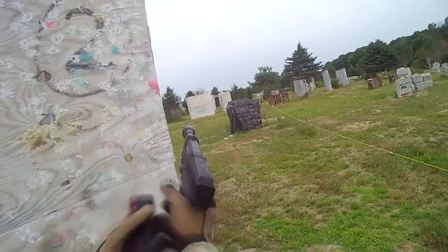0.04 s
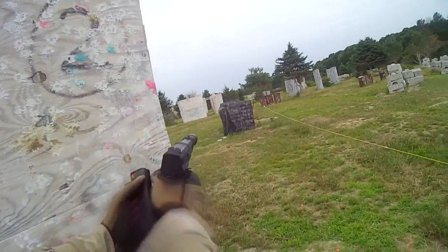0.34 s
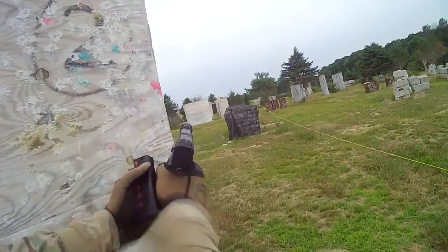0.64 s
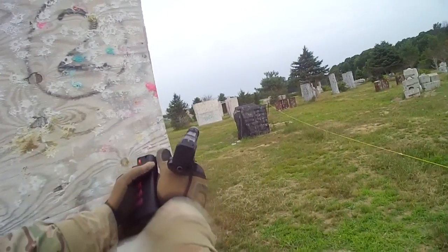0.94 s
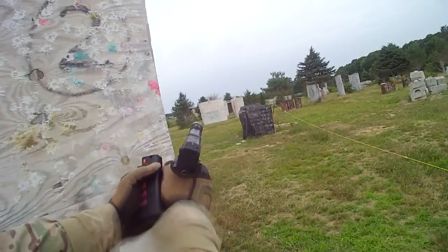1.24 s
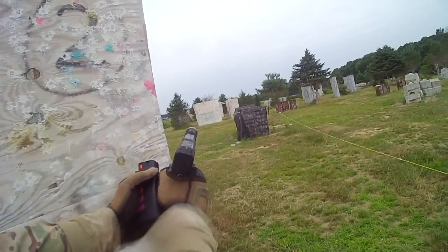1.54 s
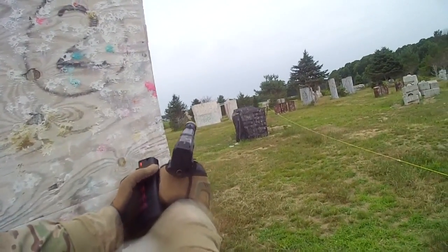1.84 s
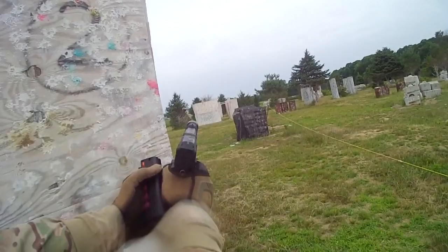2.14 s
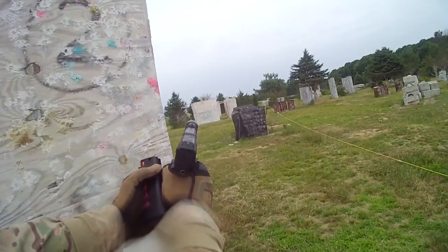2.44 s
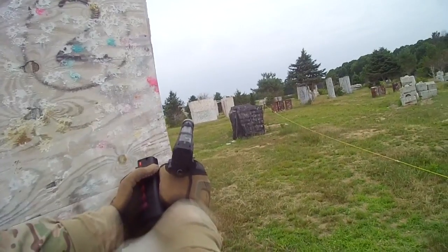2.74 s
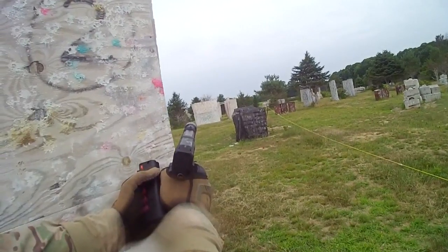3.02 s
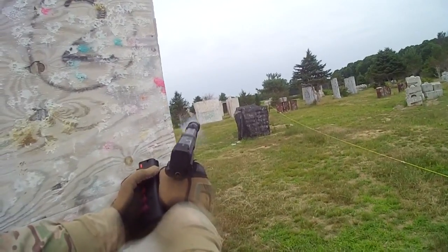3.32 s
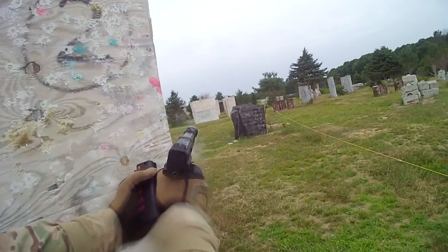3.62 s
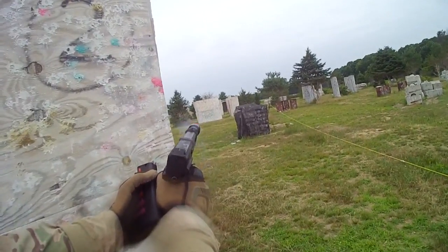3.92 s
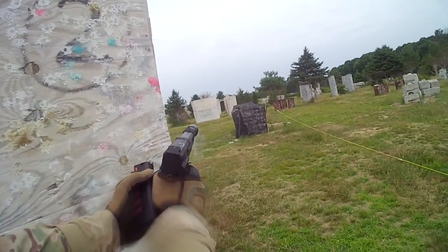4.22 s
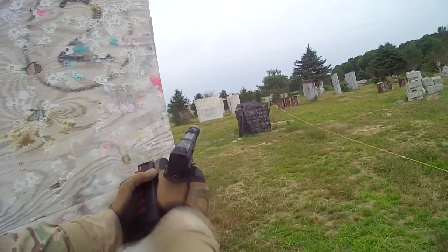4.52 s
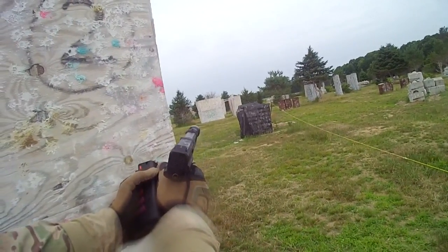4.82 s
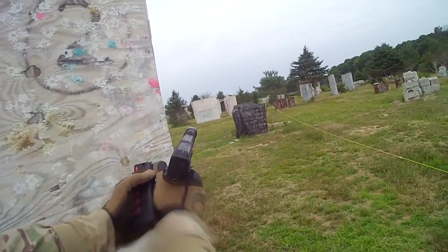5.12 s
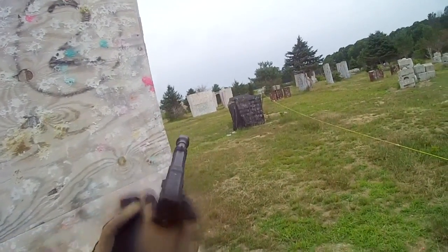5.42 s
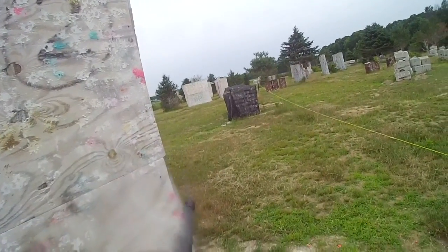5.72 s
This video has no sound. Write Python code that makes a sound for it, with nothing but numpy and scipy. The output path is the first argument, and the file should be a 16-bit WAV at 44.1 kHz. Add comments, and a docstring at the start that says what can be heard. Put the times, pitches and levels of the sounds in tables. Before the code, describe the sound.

Light wind, gear clacks and faraway paintball pops, then two loud cracks from a nearby marker echo briefly outdoors.

```python
"""An open paintball field, behind a plywood bunker: a marker fires twice, close to a body-worn microphone.
Each shot is a puff of pilot gas, the knock of the bolt and a blast that overloads the microphone;
grass, bunkers and trees throw it back. Sleeves rustle and gear clacks as the player aims.
Other markers pop far away, balls smack into cover, and a light wind buffets the microphone."""
import sys
import numpy as np
from scipy import signal
from scipy.fft import rfft, irfft
from scipy.io import wavfile

SR = 44100
rng = np.random.default_rng(int(sys.argv[2]) if len(sys.argv) > 2 else 0)


def put_to_file(sound):
    """Save the sound as 16-bit audio at rate SR, in the file named by the first command-line argument."""
    columns = np.atleast_2d(sound).T  # one column per channel
    safe = np.clip(columns, -1, 1)
    whole_steps = np.round(safe * 32767)
    wavfile.write(sys.argv[1], SR, whole_steps.astype(np.int16))


N = 254016
TIME = np.arange(N) / SR


def from_db(db):
    """Decibels to gain."""
    return 10 ** (np.asarray(db) / 20)


def colour(x, spectrum, size=4096):
    """Causal EQ through (Hz, relative dB) points; white noise keeps its power."""
    hz, db = np.transpose(spectrum)
    grid = np.maximum(np.fft.rfftfreq(size, 1 / SR), 1)
    gain = from_db(np.interp(np.log(grid), np.log(hz), db))
    cepstrum = irfft(np.log(gain))
    cepstrum[1:size // 2] *= 2   # fold for minimum phase
    cepstrum[size // 2 + 1:] = 0
    response = irfft(np.exp(rfft(cepstrum)))
    return signal.fftconvolve(x, response / np.linalg.norm(response))[:N]


def noise():
    """White noise of unit power."""
    return rng.standard_normal(N)


def drift(rate_hz):
    """A random wobble gliding between values with a spread of one."""
    knots = rng.standard_normal(N)
    return np.interp(TIME * rate_hz, np.arange(N), knots)


def clicks(rows):
    """One click for each (seconds, dB)."""
    out = np.zeros(N)
    for s, db in rows:
        out[round(s * SR)] += from_db(db)
    return out


def burst(s, level_db, fall_s, hold_s=0):
    """An envelope that jumps up, holds and dies away."""
    age = TIME - s
    return from_db(level_db) * (age >= 0) * np.exp(-np.clip((age - hold_s) / fall_s, 0, 20))


def swell(s, length_s, level_db, attack_s, release_s):
    """An envelope that fades in up to its start, holds and dies away."""
    away = np.maximum(s - TIME, 0) / attack_s + np.maximum(TIME - s - length_s, 0) / release_s
    return from_db(level_db) * np.exp(-np.clip(away, 0, 20))


def swells(rows, rest_db, attack_s, release_s):
    """A fader ride in dB: a resting level with one swell for each row."""
    power = sum(swell(s, length, db, attack_s, release_s) ** 2 for s, length, db in rows)
    return 10 * np.log10(from_db(rest_db) ** 2 + power)


def ring(force, modes):
    """Damped (Hz, dB, t60 seconds) modes in parallel, with alternating signs."""
    out = np.zeros(N)
    for k, (hz, db, t60) in enumerate(modes):
        r = np.exp(-np.log(1000) / (t60 * SR))
        w = 2 * np.pi * hz / SR
        mode = signal.lfilter([0, np.sin(w)], [1, -2 * r * np.cos(w), r * r], force + 1e-18)
        out += (-1) ** k * from_db(db) * mode
    return out


# Gusts on the microphone. Each row: start in seconds, length in seconds, level in dB.
WIND_GUSTS = [(.6, 0.26, -60), (4.61, .36, -49), (5.26, .16, -42)]
# Wind rumble and the soft rush of the field. Each row: frequency in Hz, relative level in dB.
WIND_EQ = [(20, 4.5), (50, 4), (110, -2), (200, -22.5), (400, -25.5), (1000, -58.5)]
FIELD_EQ = [(70, -8), (130, 0), (250, 0), (410, -11.5), (520, -5), (680, -8.5), (1000, -15), (1250, -19),
            (1700, -17), (2300, -20), (3500, -20.5), (4300, -25), (5700, -33), (15000, -34)]


def air():
    """The bed: wind buffets each microphone port a little differently, over the rush of the field."""
    gust_db = swells(WIND_GUSTS, rest_db=-55.5, attack_s=.063, release_s=.057)
    centre = colour(noise(), WIND_EQ)
    sides = from_db(-17) * colour(noise(), WIND_EQ) * [[1], [-1]]
    wind = (centre + sides) * from_db(gust_db + 3 * drift(8))
    field = colour(noise(), FIELD_EQ) * from_db(-57 + 1.6 * drift(22))
    hiss = from_db(-79.5) * np.array([noise(), noise()])
    return wind + field + hiss


def far_tone(start_s=4.53, pitch_hz=678, sag_hz_per_s=300):
    """A faint, thin tone swells once and sags in pitch."""
    hz = pitch_hz - sag_hz_per_s * (TIME - start_s)
    level = swell(start_s, length_s=.11, level_db=-55, attack_s=.022, release_s=.03)
    return level * np.sin(2 * np.pi * np.cumsum(hz) / SR)


# Markers across the field. Each row: start in seconds, relative level in dB.
POPS = [(.2125, -47.5), (0.411, -47), (1.3847, -47.5), (1.6181, -47.5), (2.031, -45), (2.3638, -49),
        (2.703, -47.5), (3.103, -52), (3.8072, -47), (4.355, -46.5), (4.874, -48.5), (5.241, -46.5)]
# A hollow pop and the dull wash off the trees. Each row: frequency in Hz, relative level in dB.
POP_EQ = [(60, -3.5), (200, -3.5), (420, -6.5), (670, 4), (950, -6.5), (1300, -11.5), (3300, -15),
          (5500, -31), (15000, -49)]
TREES_EQ = [(100, -2.5), (600, -2.5), (1000, 1.5), (1300, -4), (1700, 5), (2150, -3.5), (2550, -0.5),
            (3200, -3), (4500, -8.5), (8000, -27.5), (15000, -41)]


def far_markers():
    """Hollow pops wash back from the trees, each trailed by a thin, airy whistle."""
    hollow = ring(clicks(POPS), [(644, 1, .07)])
    puffs = sum(burst(s, db - 4.5, fall_s=.0052) + burst(s, db - 13.5, fall_s=.06) for s, db in POPS)
    wash = sum(burst(s + .03, db - 15.5, fall_s=.041, hold_s=.045) for s, db in POPS)
    pops = hollow + colour(puffs * noise(), POP_EQ) + colour(wash * noise(), TREES_EQ)
    trails = sum(swell(s + .14, 0, level_db=-73, attack_s=.06, release_s=.06) for s, _ in POPS)
    whistle = trails * colour(noise(), [(2800, -39.5), (3380, -2), (3600, -1), (4100, -41.5)])
    return pops + whistle


# Balls hitting cover. Each row: start in seconds, relative levels of crack and scatter in dB.
BALL_HITS = [(1.0786, -36, -43), (1.127, -24.5, -41), (1.1631, -16.5, -32.5), (1.854, -49, -48.5),
             (1.901, -44, -59), (1.9156, -37.5, -71), (3.1006, -33, -54.5), (4.5926, -19.5, -40),
             (4.6235, -35, -46)]
# The tone of a smack, also used for the gear. Each row: frequency in Hz, relative level in dB.
SMACK_EQ = [(80, 2), (400, -7.5), (850, 0), (1400, -1.5), (3000, -3), (4500, -15.5), (7000, -36),
            (11000, -34), (15000, -35)]


def ball_smacks():
    """A ball hits cover with a sharp crack and a short tail of scatter."""
    cracks = clicks([(s, db + 5) for s, db, _ in BALL_HITS])
    tails = sum(burst(s, db, fall_s=.008) + burst(s, db - 12, fall_s=.041) for s, _, db in BALL_HITS)
    scatter = signal.sosfilt(signal.butter(1, 7000, fs=SR, output="sos"), tails * noise())
    return colour(scatter - cracks, SMACK_EQ)


# Arm moves. Each row: start in seconds, length in seconds, level in dB.
SLEEVE_STROKES = [(.42, .1, -57.5), (.6, 0.36, -49.5), (1.19, .12, -50.5), (1.45, 0.078, -58),
                  (1.9, 0.01, -53.5), (3.09, 0.072, -57), (4.66, 0.025, -54.5), (5.3, 0.23, -57.5)]
# The soft body of the rustle. Each row: frequency in Hz, relative level in dB.
CLOTH_EQ = [(60, -8), (130, -1.5), (300, -3), (550, -8), (1000, -9), (2700, -14), (4200, -20), (5800, -34),
            (10000, -47.5), (15000, -49)]


def sleeves():
    """Cloth rubs in uneven grains and gives a bright swish when rubbed hard."""
    rub_db = swells(SLEEVE_STROKES, rest_db=-66.5, attack_s=.073, release_s=.089)
    grains = noise() * from_db(3 * drift(700) + 1.8 * drift(60))
    grains /= np.sqrt(np.mean(grains ** 2))
    snags = noise() * from_db(4 * drift(300) - 67 + 3.6 * (rub_db - rub_db.max()))
    swish = colour(snags, [(1500, -15), (4500, 1.5), (9000, -7), (15000, -16.5)])
    return colour(grains * from_db(rub_db), CLOTH_EQ) + swish


# Low thumps: one under the first shot, three under distant pops, the rest from the player moving.
# Each row: start in seconds, relative level in dB, pitch in Hz.
THUMPS = [(0.309, -42, 70), (0.411, -41.5, 110), (0.585, -34.5, 231), (0.616, -39, 330), (0.651, -34, 507),
          (0.671, -34, 230), (.712, -43, 392), (0.751, -33, 106), (1.206, -38, 138), (1.386, -42, 110),
          (3.002, -44, 150), (3.339, -27.5, 135), (3.638, -41.5, 216), (5.246, -43.5, 90),
          (5.433, -42, 330)]
# Their bassy scuff. Each row: frequency in Hz, relative level in dB.
SCUFF_EQ = [(30, -1.5), (90, 9), (220, -6), (500, -5.5), (1200, -14), (3000, -23), (8000, -52.5)]


def low_thumps():
    """Each thump is a short, bassy scuff with a hollow ring."""
    scuffs = sum(burst(s, db - 7, fall_s=.0088, hold_s=.012) for s, db, _ in THUMPS)
    thuds = sum(ring(clicks([(s, db - 3.5)]), [(hz, 0, .045)]) for s, db, hz in THUMPS)
    return colour(scuffs * noise(), SCUFF_EQ) + thuds


# Plastic gear clacking. Each row: start in seconds, relative level in dB, pitch in Hz.
GEAR_CLACKS = [(.587, -40, 1680), (.6165, -35.5, 1450), (.712, -40, 1940), (0.791, -38, 1730),
               (0.7927, -36.5, 3760), (0.916, -36, 2720), (.932, -28.5, 2620), (0.971, -30, 3470),
               (1.0937, -36, 1120), (1.133, -38.5, 796), (1.1981, -27, 2650), (1.277, -42, 3520),
               (1.574, -40.5, 3200), (1.8568, -34, 790), (5.268, -45.5, 1550)]


def gear():
    """Plastic scrapes briefly and rings for a few dozen cycles, with a weaker overtone."""
    rings = sum(ring(clicks([(s, db)]), [(hz, -1, 30 / hz), (1.215 * hz, -7, 22 / hz)])
                for s, db, hz in GEAR_CLACKS)
    scrapes = sum(burst(s, db - 10.5, fall_s=.0043) for s, db, _ in GEAR_CLACKS)
    return rings + colour(scrapes * noise(), SMACK_EQ)


# Slapback off the nearest bunkers. Each row: delay in seconds, level in dB, decay in seconds.
SLAPBACKS = [(0.047, -27, 0.011), (0.061, -22.5, 0.012), (0.0802, -15, 0.003), (.096, -35.5, 0.0073)]
# The tone of the bunker echoes. Each row: frequency in Hz, relative level in dB.
SLAPBACK_EQ = [(30, -26), (100, -12.5), (350, -12), (560, -6), (740, -11.5), (880, 0), (1060, 2),
               (1400, -2.5), (1700, -7), (2200, -7), (2600, -5), (3000, -7.5), (3700, -8), (5300, -5),
               (7500, -8.5), (15500, -19.5)]


def echoes(blast):
    """Grass scatters the report at once, bunkers return it in clumps, the dull tree line lasts longest."""
    bunkers = np.sqrt(sum(burst(delay, db, fall_s) ** 2 for delay, db, fall_s in SLAPBACKS))
    # The bunkers beyond merge into one uneven, dying return.
    beyond = burst(.116, level_db=-35.5, fall_s=.055) * from_db(3 * drift(140))
    near_paths = colour(noise() * np.hypot(bunkers, beyond), SLAPBACK_EQ)
    far_eq = [(100, -8.5), (1000, -1.5), (1700, -2.5), (3000, -2), (6000, -3), (15000, -20.5)]
    far_paths = colour(noise() * burst(0, level_db=-45, fall_s=.11), far_eq)
    returned = signal.fftconvolve(blast / np.linalg.norm(blast), near_paths + far_paths)[:N]
    grass = sum(burst(s, level_db=-29, fall_s=.014) for s, *_ in CLOSE_SHOTS)
    trees = sum(burst(s, level_db=-40.5, fall_s=.17) for s, *_ in CLOSE_SHOTS)
    return returned + colour(grass * noise(), JET_EQ) + colour(trees * noise(), TREES_EQ)


def vent():
    """Spent gas leaks from the breech after each shot as a bright, dying hiss."""
    leak = sum(burst(s, level_db=-38.5, fall_s=.036) for s, *_ in CLOSE_SHOTS)
    leak_eq = [(1000, -13), (3000, -2), (5000, -4), (8000, 0), (13000, -2.5), (15500, -6.5)]
    return colour(leak * noise(), leak_eq)


def pilot_gas(lead_s=.0275):
    """A small puff of pilot gas hisses just ahead of each blast."""
    puff = sum(burst(s - lead_s, level_db=-34, fall_s=.008, hold_s=.0032) for s, *_ in CLOSE_SHOTS)
    return colour(puff * noise(), [(300, -3.5), (2700, -.5), (4000, -5.5), (12000, -10), (15500, -18)])


# Trigger resets and small ticks. Each row: start in seconds, relative level in dB.
MARKER_TICKS = [(3.4452, -29), (3.449, -7), (3.5863, -29), (3.7358, -37), (3.7828, -40.5), (4.1015, -32),
                (4.1105, -7), (4.1732, -26.5), (4.703, -38.5)]
# The marker's metal body. Each row: pitch in Hz, level in dB, seconds to fade by 60 dB.
BODY_MODES = [(160, -25.5, .014), (545, -28.5, .012), (1000, -14, 0.026), (1755, -9.5, 0.011),
              (2767, -8, 0.012), (3530, -3.5, 0.0056), (4000, -4.5, 0.0033), (6300, -14, 0.0014),
              (10900, -20, 0.0017), (12600, -24, .003)]


def mechanism(bolt_lead_s=.0062):
    """The bolt knocks and slides, the next ball rattles in, the trigger resets; the metal body rings."""
    bolt_times = [s - bolt_lead_s for s, *_ in CLOSE_SHOTS]
    knocks = clicks([(s, -2.5) for s in bolt_times] + MARKER_TICKS)
    slide = sum(burst(s, level_db=-14.5, fall_s=.003, hold_s=.0026) for s in bolt_times)
    feed = sum(burst(s + .051, level_db=-32, fall_s=.0048, hold_s=.027) for s, *_ in CLOSE_SHOTS)
    rattle = feed * noise() * (rng.random(N) < 900 / SR)   # about 900 contacts a second
    chatter = from_db(12.5) * colour(rattle, [(1000, -1), (4000, -4), (10000, -15.5), (15500, -31)])
    return ring(knocks + rattle, BODY_MODES) + chatter + colour(slide * noise(), JET_EQ)


# The barrel's air column. Each row: pitch in Hz, level in dB, seconds to fade by 60 dB.
BARREL_MODES = [(142, -21.5, .03), (277, -14, 0.035), (450, -10.5, 0.033), (610, -9, .032),
                (985, -4.5, 0.021), (1268, -18.5, 0.032), (1656.6, -6, .03), (2067, -15.5, 0.036),
                (2580, -14, 0.018), (2940, -9, 0.029)]
# The bite of the gas jet at the muzzle. Each row: frequency in Hz, relative level in dB.
JET_EQ = [(25, -42), (60, -29.5), (300, -11), (800, -5.5), (1700, -2), (3000, -0.5), (4500, -9.5),
          (8000, -20), (15000, -30)]
# The two hero shots. Each row: start in seconds, relative level in dB, then the squeal's
# pitch in Hz at four even steps while the valve is open.
CLOSE_SHOTS = [(3.333, 7.9, 1377, 2496, 2983, 3004), (3.9756, 8.8, 1293, 1832, 1940, 2846)]


def blasts(valve_open_s=.0061):
    """Gas squeals upward in pitch while the valve is open; the barrel rings on and the jet dies away."""
    squeal, jet = np.zeros(N), np.zeros(N)
    for s, db, *steps_hz in CLOSE_SHOTS:
        valve = burst(s, db, fall_s=.00064, hold_s=valve_open_s)
        hz = np.interp(TIME, np.linspace(s, s + valve_open_s, len(steps_hz)), steps_hz)
        squeal += valve * np.sin(2 * np.pi * np.cumsum(hz * (TIME >= s)) / SR)
        tail = burst(s + valve_open_s, db - 25.5, fall_s=.0048, hold_s=.0022)
        jet += from_db(-5.5) * valve + tail
    barrel = ring(clicks([(s, db) for s, db, *_ in CLOSE_SHOTS]), BARREL_MODES)
    return from_db(-4) * squeal + colour(jet * noise(), JET_EQ) + barrel


def scene():
    """The mix: everything sits dead centre except the wind and a faint hiss."""
    blast = blasts()
    # The marker is too small to radiate deep bass.
    bass_cut = signal.butter(2, 70, "high", fs=SR, output="sos")
    marker = signal.sosfilt(bass_cut, blast + pilot_gas() + mechanism() + vent())
    downfield = echoes(blast) + ball_smacks() + far_markers() + far_tone()
    details = sleeves() + low_thumps() + gear()
    return air() + downfield + details + marker


def record(dry, ceiling=.97, cutoff_hz=15300):
    """The blasts overload the input and clip hard; a steep low-pass takes off the top end."""
    clipped = np.clip(dry, -ceiling, ceiling)
    return signal.sosfilt(signal.ellip(8, .1, 70, cutoff_hz, fs=SR, output="sos"), clipped)


dry = scene()
out = record(dry)
put_to_file(out)
```